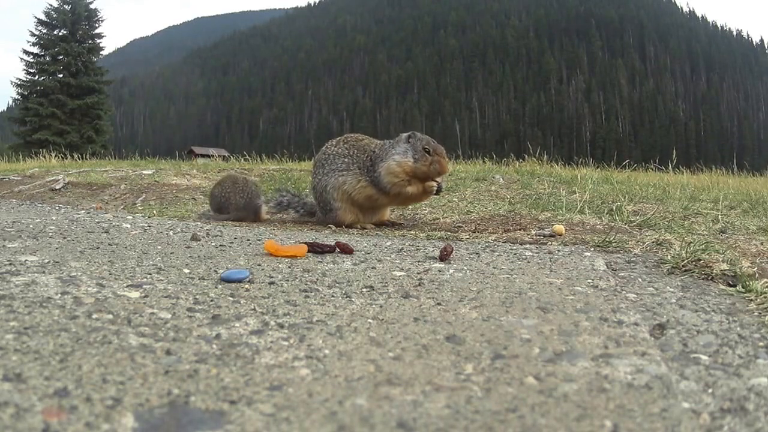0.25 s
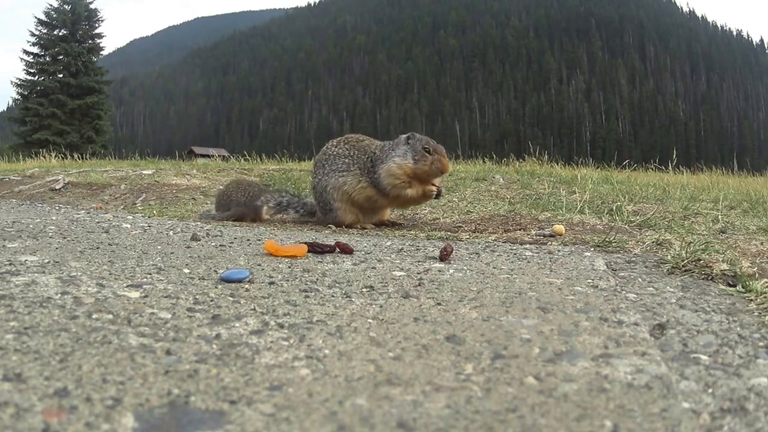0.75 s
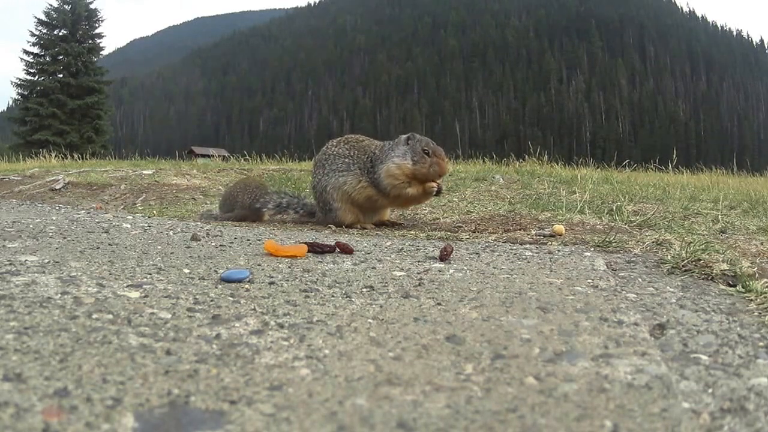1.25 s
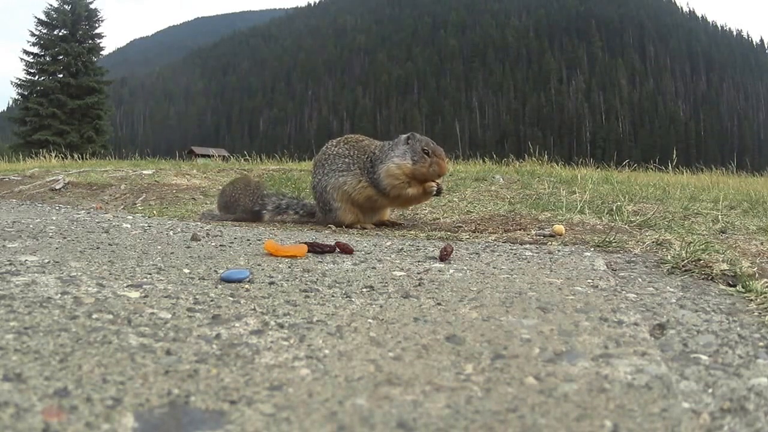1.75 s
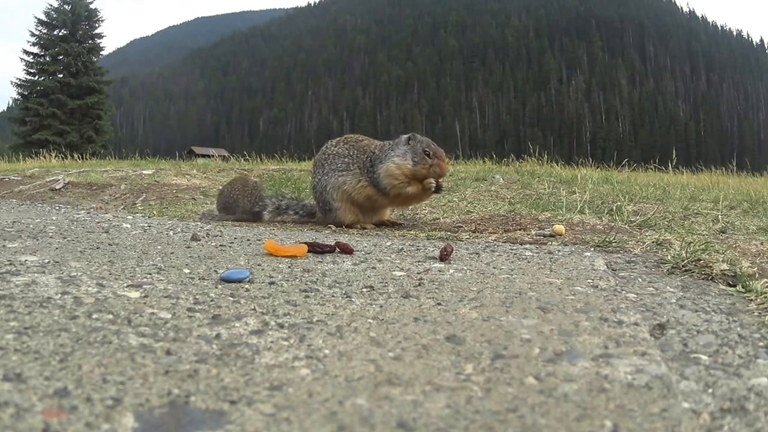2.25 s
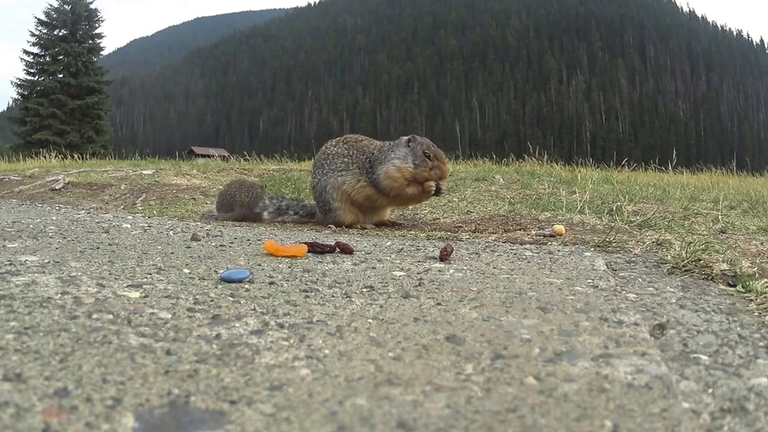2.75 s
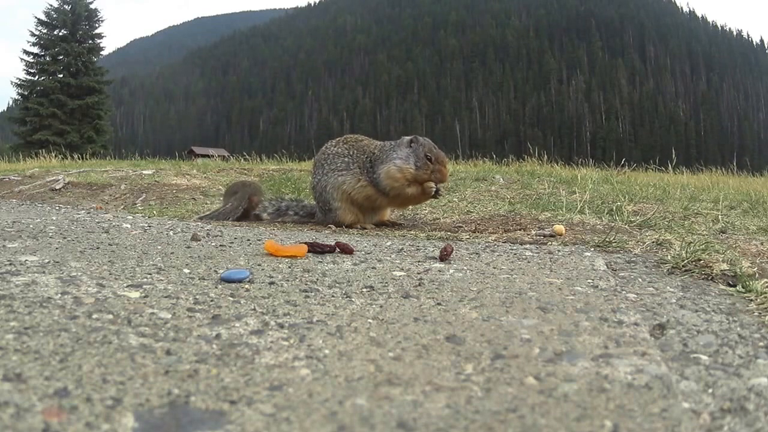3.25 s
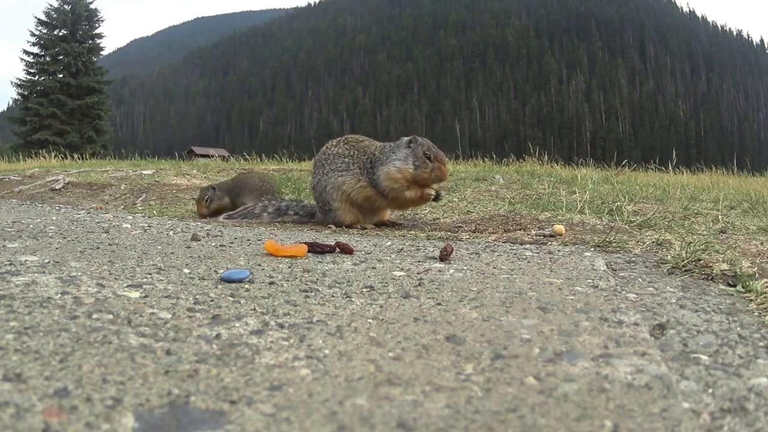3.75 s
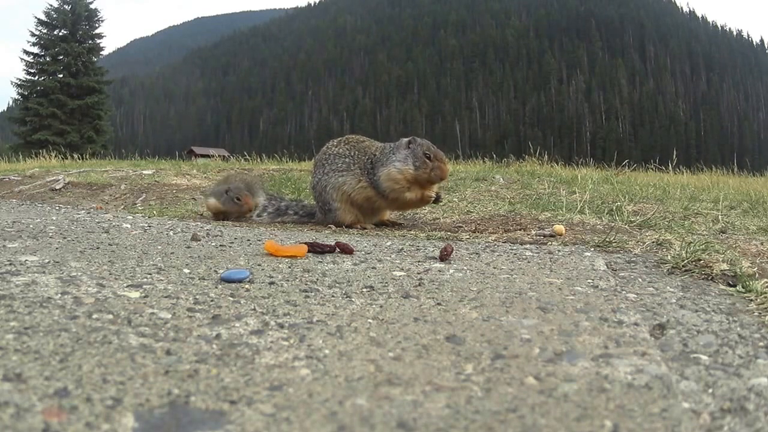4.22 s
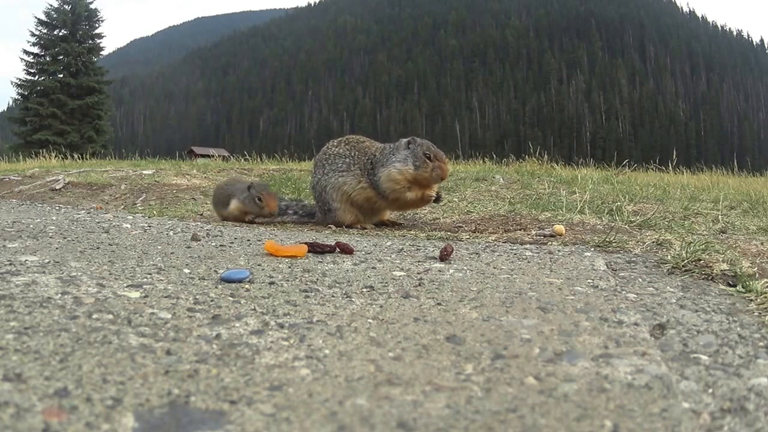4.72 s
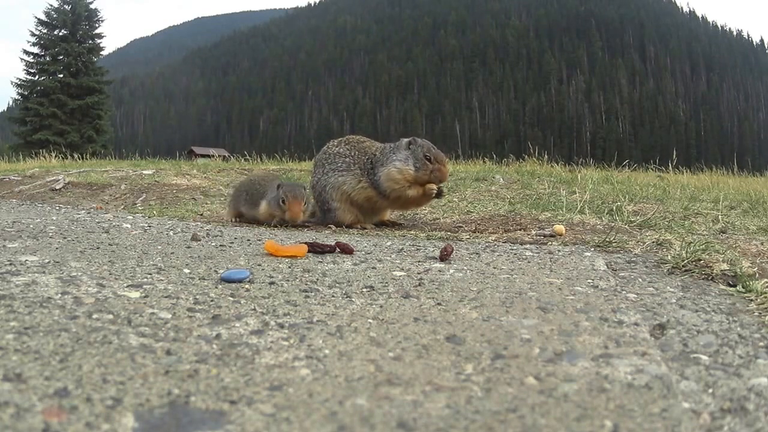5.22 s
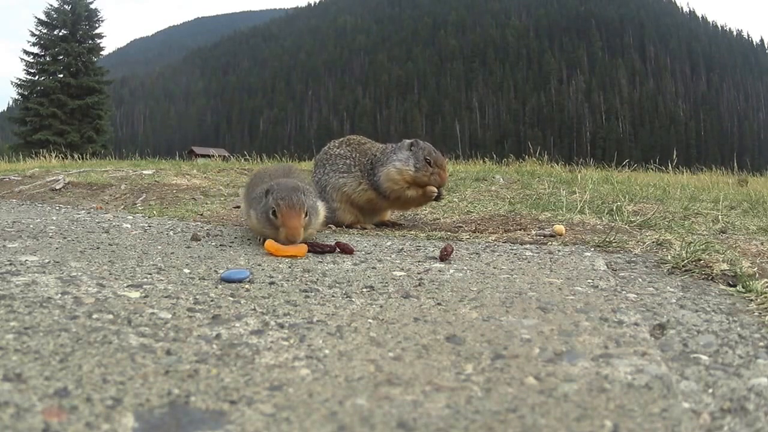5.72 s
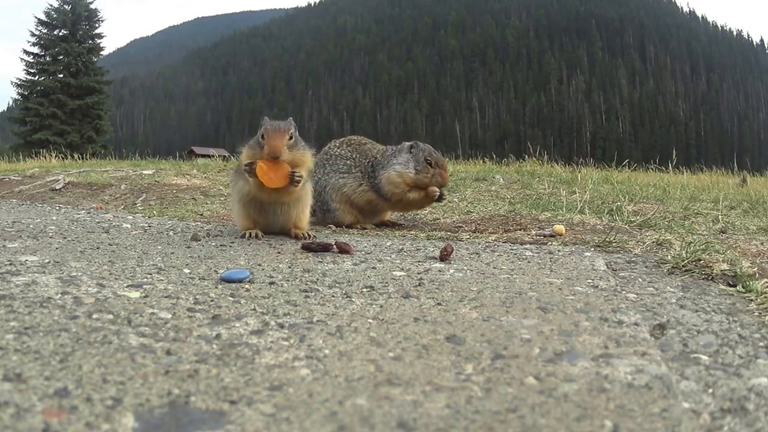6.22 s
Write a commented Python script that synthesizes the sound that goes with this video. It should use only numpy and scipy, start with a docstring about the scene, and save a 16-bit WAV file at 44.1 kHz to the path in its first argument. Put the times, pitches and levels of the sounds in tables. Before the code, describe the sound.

Outdoors in a wide, quiet meadow, dry food cracks sharply and close, in irregular bursts separated by faint nibbling. Very short, piercing animal whistles drop in pitch and scatter off ground and trees, answered by softer distant peeps. Early on something bumps the microphone stand dully; a small dry grass scuff follows. A low rumble swells gently past the middle, and tiny paws pat gravel near the end.

```python
"""A gravel path in a mountain meadow, where two ground squirrels feed close to a small microphone on the ground.
Snaps of food are double fractures exciting resonances; fainter chewing and dry scuffs are trains of random ticks,
and paw pats are decaying noise. Small animals whistle and chirp with gliding sines, answered by diffuse echoes.
A dull knock with a softer rebound rings the modes of the microphone's stand, over a low rumble and open-air hiss."""
import sys
import numpy as np
from scipy import signal
from scipy.fft import rfft, irfft, next_fast_len
from scipy.io import wavfile
from scipy.ndimage import uniform_filter1d

SR = 44100
rng = np.random.default_rng(int(sys.argv[2]) if len(sys.argv) > 2 else 0)


def generate_wav(sig):
    """Save sig (samples, or channels by samples) to the path in sys.argv[1] as 16-bit PCM at SR."""
    pcm = np.round(np.clip(np.atleast_2d(sig).T, -1, 1) * 32767).astype(np.int16)
    wavfile.write(sys.argv[1], SR, pcm)


N = 285327
TIME = np.arange(N) / SR

# Snaps of food: t/s, level/dB, crumb f/Hz, brittleness/dB, hollow ring/dB (the last two relative to the level)
BITES = [(.1359, -43, 2550, -12.5, -24), (0.6967, -39.5, 2200, -8.5, -19), (.7569, -49.5, 3000, -0.5, -10),
         (1.096, -52.5, 2900, 5, -7), (1.3806, -50.5, 3230, 0, -18), (1.8749, -39, 2360, -13, -8),
         (1.96, -55.5, 3450, 8.5, -14), (1.9641, -53, 3170, 4, -14), (2.1893, -51.5, 2980, -1.5, -15),
         (2.3137, -24, 2770, -6, -23), (2.381, -25.5, 3200, 2.5, -5), (2.4726, -34.5, 2930, -10.5, -30),
         (2.5019, -30.5, 2730, -3, -20), (2.7535, -43, 2940, -8.5, -14), (2.8373, -43, 2960, -4, -19),
         (2.8775, -40, 3040, 1.5, -24), (2.8806, -30.5, 3130, -7, -37), (3.0321, -44.5, 2340, 6, -4.5),
         (3.1328, -42, 2900, -1.5, -24), (3.1541, -29.5, 3440, -4, -20), (3.182, -35, 3500, 3, -17),
         (3.2872, -44.5, 2860, -5, -22), (3.3121, -36.5, 2270, -4.5, -9), (3.3737, -26, 2990, -3, -13),
         (3.727, -44, 2630, -6.5, -30), (4.2342, -50.5, 2420, -1.5, -17), (4.5687, -53.5, 2850, 4, -9),
         (4.7289, -45.5, 2600, -11, -22), (5.012, -50, 3080, -3, -2), (5.432, -30.5, 2800, -11.5, -23),
         (5.461, -46, 2800, -2, -8), (5.4674, -23.5, 2700, -4.5, -18.5), (5.556, -34.5, 2780, -10, -25),
         (5.5939, -34, 2680, 5.5, -12), (5.7061, -35.5, 2890, -8.5, -30), (5.7711, -30.5, 3230, 0, -31),
         (5.8959, -39.5, 2740, -9, -24), (5.9259, -32.5, 2580, -5, -31), (5.9351, -37.5, 2740, 2.5, -24),
         (5.9433, -40.5, 2850, -1, -24), (6.1248, -28.5, 2260, -5, -16), (6.253, -26.5, 2450, -9, -22)]
# Left minus right of hollow, crumb, edge and splinters: level difference/dB
BITE_PAN_DB = (-5.5, -4, -1.5, -6)
HOLLOW_HZ, HOLLOW_WIDTH_HZ, CRUMB_WIDTH_HZ = 1313, 135, 530
EDGE_HZ, EDGE_WIDTH_HZ = 4630, 940
SPLINTER_LOW_HZ, SPLINTER_HIGH_HZ = 6600, 11040
# Levels against the crumb for a piece of zero brittleness; brittleness raises both
EDGE_DB, SPLINTER_DB = -1.0, -5.5
# The second fracture: median delay, spread of the delay, amplitude relative to the first
SECOND_S, SECOND_SPREAD_OCTAVES, SECOND_SHARE = .00036, .35, 0.54

# Level curve of the faint chewing: t/s, level/dB
CHEWING_LEVEL = [(0, -63), (.35, -69), (1.0, -73), (1.3, -67), (2.1, -74), (3.2, -65.5), (4.2, -70),
                 (6.0, -63.5)]

# Strokes of a body shifting in dry grass: t/s, level/dB at the peak
SCUFFS = [(1.779, -52.5), (1.833, -47.5), (1.88, -45.5), (1.925, -58.5)]
# Spectrum of the dry scuff: f/Hz, relative level/dB
SCUFF_SPECTRUM = [(530, -55), (900, -23), (1520, -11.5), (1690, -20), (2310, 0.5), (3030, -14.5),
                  (4070, -6), (4380, -12), (4960, -8), (6520, -18), (11000, -33), (14300, -63),
                  (22000, -120)]
SCUFF_RISE_S, SCUFF_FALL_S = 0.02, 0.014

# Paws on gravel: t/s, thud drive level/dB, grit drive level/dB (before the gains in paws)
PAWS = [(5.484, -56.5, -65), (5.825, -58.5, -77), (5.866, -52, -80), (5.917, -55, -75), (6.075, -58, -71),
        (6.094, -73, -58.5), (6.162, -64, -65), (6.278, -60, -55.5), (6.349, -68, -66)]
# Resonances of ground and stand under a thud: f/Hz, width/Hz, relative level/dB
THUD_MODES = [(172, 27, -13), (314, 24, -3), (450, 100, -22)]
# Spectrum of shifting grit: f/Hz, relative level/dB
GRIT_SPECTRUM = [(300, -34), (700, 2), (1300, 9), (2500, -16), (6000, -34)]

# Whistles of the nearest caller: t/s, length/s, direct level/dB
NEAR_WHISTLES = [(0.402, 0.055, -41.5), (1.61, 0.048, -40), (2.982, 0.051, -37.5), (4.31, 0.047, -47.5),
                 (5.79, .052, -37)]
# Loudness through a near whistle: share of its length, relative level/dB
NEAR_SHAPE = [(0, -17.5), (.14, -2.5), (.32, -1), (.55, 2.5), (.74, 0.5), (.85, 4.5), (1, -8)]
NEAR_HZ, NEAR_THROWN_DB = 5025, -38
# Nearly level notes of far callers: t/s, length/s, f/Hz, direct level/dB, closing drop/octaves
FAR_WHISTLES = [(0.065, 0.078, 4340, -69, .06), (0.17, 0.037, 2690, -56, .1),
                (.959, 0.045, 3585, -56, 0.056), (1.064, 0.043, 3524, -52, 0.071),
                (1.19, 0.079, 3580, -66, 0.044), (1.416, 0.038, 3830, -50, 0.022),
                (2.467, 0.072, 3587, -57, .02), (2.623, 0.066, 3550, -61.5, 0.035),
                (3.612, 0.05, 3630, -54.5, .04), (3.728, 0.039, 3540, -56, 0.11),
                (3.855, .037, 3570, -61, .05), (4.588, 0.049, 4730, -58, 0.18),
                (4.737, .062, 3870, -62, .3), (5.065, 0.05, 3620, -50.5, .01),
                (5.25, 0.059, 3590, -59.5, .01)]
# Short rising chirps of another caller: t/s, direct level/dB
CHIRPS = [(.294, -65), (1.572, -55), (2.798, -56), (3.925, -56), (5.152, -54), (6.442, -46)]
# Loudness through a far note or chirp: share of its length, relative level/dB
FAR_SHAPE = [(0, -12), (.3, 1.5), (.7, 0.5), (1, -1.5)]
CHIRP_HZ, CHIRP_S, CHIRP_THROWN_DB = 3470, 0.0277, -56.5
# Patches of ground and trees that throw sound back: delay t/s, spread/s, weight/dB
ECHOES = [(.006, 0.0052, -4), (.036, 0.026, -6.5), (0.077, 0.045, -17), (.208, 0.0098, -18)]

# Knock on the stand and its rebound: t/s, strike level/dB, contact time/s
KNOCKS = [(0.967, 0.5, .0005), (1.04, -4.5, 0.0035)]
# Modes of the stand: f/Hz, level/dB for an instant contact, 60 dB decay time/s
STAND_MODES = [(43.7, -54, 3.9), (69, -34, 0.15), (115.6, -46, 0.41), (132.85, -42, 0.91), (219, -47, 0.25),
               (334, -50.5, 0.32), (426, -57, 0.13)]

# Broad resonances of the rumble: f/Hz, width/Hz of each of two filter passes, relative level/dB
RUMBLE_MODES = [(125.4, 20.7, -0.5), (217, 99, -4), (316, 49, -7)]
RUMBLE_DB, SWELL_DB, SWELL_AT_S, SWELL_WIDTH_S = -70, 8.5, 4.27, 0.46

# Spectrum of the air common to both sides: f/Hz, relative level/dB
AIR_MID = [(12, -48), (20, -0.5), (81, -5), (124, -3.5), (259, -13), (328, -11.5), (428, -12.5), (635, -14),
           (688, -14.5), (827, -14.5), (2030, -16.5), (2640, -15), (3440, -17), (4980, -19), (11000, -23),
           (14300, -120), (22000, -120)]
# Spectrum of the air opposed between the sides: f/Hz, relative level/dB
AIR_SIDE = [(12, -51), (20, -8), (85, -22), (124, -4), (153, -26), (189, -6.5), (303, -9), (346, -6),
            (475, -5.5), (995, -5.5), (1140, -6.5), (2510, -10.5), (11000, -25), (14300, -62),
            (22000, -120)]
AIR_MID_DB, AIR_SIDE_DB = -60, -58.5
# Narrow bands that stand out of the air: f/Hz, nominal width/Hz, level/dB
HUMS = [(126.3, 18.4, -73), (215, 22, -79), (322.5, 37, -84.5), (1336, 110, -74.5)]
# A thin high tone: f/Hz, nominal width/Hz, level/dB
THIN_TONE = (8333, 8, -82)
CUTOFF_HZ = 11200


def from_db(db):
    """Level: an amplitude ratio is ten to the power of dB / 20."""
    return 10 ** (np.asarray(db) / 20)


def rms_one(x):
    """Normalisation: dividing by the root mean square gives unit power."""
    return x / np.sqrt(np.mean(x ** 2) + 1e-20)


def add(out, s, sound):
    """Superposition: a sound starting at s seconds sums with the rest."""
    i = int(np.clip(round(s * SR), 0, N - 1))
    out[..., i:i + sound.shape[-1]] += sound[..., :N - i]


def panned(x, pan_db):
    """Interchannel level difference: the left is louder than the right by pan_db."""
    return x * from_db([[pan_db / 2], [-pan_db / 2]])


def coloured(x, spectrum):
    """Spectral shaping: weight by dB points joined over log frequency, then set the rms to 1."""
    hz, db = np.transpose(spectrum)
    size = next_fast_len(len(x))
    bins = np.maximum(np.fft.rfftfreq(size, 1 / SR), 1)
    gain = from_db(np.interp(np.log(bins), np.log(hz), db))
    return rms_one(irfft(rfft(x, size) * gain, size)[:len(x)])


def resonate(x, hz, width_hz):
    """Damped resonance: a pole pair rings at hz, with about unit gain at its peak."""
    r = np.exp(-np.pi * width_hz / SR)
    zeros = [(1 - r * r) / 2, 0, (r * r - 1) / 2]
    poles = [1, -2 * r * np.cos(2 * np.pi * hz / SR), r * r]
    return signal.lfilter(zeros, poles, x + 1e-18)


def narrow_noise(hz, width_hz):
    """Narrow-band noise: two equal resonances select a band; the first second settles and is dropped."""
    noise = rng.standard_normal(N + SR)
    return rms_one(resonate(resonate(noise, hz, width_hz), hz, width_hz)[SR:])


def band(x, low_hz, high_hz):
    """Band-pass: gentle slopes on both sides of the pass band."""
    return signal.sosfilt(signal.butter(2, [low_hz, min(high_hz, SR / 2.2)], "band", fs=SR, output="sos"), x)


def crackle(per_s, spread_db):
    """Impulse noise: tiny fractures at random times, with random signs and scattered sizes."""
    sizes = from_db(spread_db * np.minimum(rng.exponential(1, N), 4)) * rng.choice([-1, 1], N)
    return sizes * (rng.random(N) < per_s / SR)


def bites(crumble_db=-32, crumble_s=0.0045, echo_s=0.008, echo_db=-25):
    """Impulsive excitation: a double fracture with trailing crumble rings hollow, crumb, edge and splinters."""
    out, t = np.zeros((2, N)), np.arange(SR // 40) / SR
    millisecond = SR / 1000  # in samples
    for s, db, pitch_hz, brittle_db, hollow_db in BITES:
        force = from_db(crumble_db) * rng.standard_normal(len(t)) * np.exp(-t / crumble_s)
        force[0] += 1
        # the second fracture cuts a comb into the spectrum, so each snap has its own colour
        lag_s = SECOND_S * 2 ** (SECOND_SPREAD_OCTAVES * rng.standard_normal())
        force[int(np.clip(round(lag_s * SR), 1, len(t) - 1))] += SECOND_SHARE
        # one weak reflection from nearby
        force[int(echo_s * SR)] += from_db(echo_db)

        hollow = resonate(band(band(force, 1250, 3700), 1250, 3700), HOLLOW_HZ, HOLLOW_WIDTH_HZ)
        crumb = resonate(band(force, 1480, 3400), pitch_hz, CRUMB_WIDTH_HZ)
        edge = resonate(band(force, 3270, 7820), EDGE_HZ, EDGE_WIDTH_HZ)
        splinters = -band(force, SPLINTER_LOW_HZ, SPLINTER_HIGH_HZ)
        parts = [hollow, crumb, edge, splinters]
        parts_db = [hollow_db, 0, EDGE_DB + brittle_db, SPLINTER_DB + brittle_db]
        for part, part_db, pan_db in zip(parts, parts_db, BITE_PAN_DB):
            # the level is the rms the part would have if its energy filled one millisecond
            unit_part = part * np.sqrt(millisecond / np.sum(part ** 2))
            add(out, s, panned(from_db(db + part_db) * unit_part, pan_db))
    return out


def chewing(per_s=150, spread_db=2.0):
    """Random excitation: small ticks of molars grinding crumbs ring two broad resonances and a high band."""
    ticks = crackle(per_s, spread_db)
    crumb = resonate(ticks, 2550, 910)
    edge = 0.62 * resonate(ticks, EDGE_HZ, EDGE_WIDTH_HZ)
    splinters = 0.069 * band(ticks, SPLINTER_LOW_HZ, SPLINTER_HIGH_HZ)
    return rms_one(crumb + edge + splinters) * from_db(np.interp(TIME, *np.transpose(CHEWING_LEVEL)))


def scuff(per_s=330, spread_db=0.5, stalk_width_hz=300, snap_db=-3, count=14):
    """Modal crackle: dry stalks tick at pitches of their own among unpitched snaps, in swelling strokes."""
    level = 0
    for s, db in SCUFFS:
        stroke = np.exp(np.minimum((TIME - s) / SCUFF_RISE_S, (s - TIME) / SCUFF_FALL_S))
        level = level + from_db(db) * stroke
    pitches = np.geomspace(1300, 7000, count)
    stalks = sum(resonate(crackle(per_s / count, spread_db), hz, stalk_width_hz) for hz in pitches)
    snaps = rms_one(crackle(per_s / 2, spread_db))
    crunch = rms_one(stalks) + from_db(snap_db) * snaps
    return panned(coloured(crunch, SCUFF_SPECTRUM) * level, pan_db=3.5)


def paws(rise_s=0.002, fall_s=0.018, grit_s=0.0084):
    """Contact noise: a soft pat drives low resonances with a noise burst and shifts grit for a moment."""
    thud, grit, t = np.zeros(N), np.zeros(N), np.arange(SR // 8) / SR
    attack = 1 - np.exp(-t / rise_s)
    for s, thud_db, grit_db in PAWS:
        add(thud, s, from_db(thud_db) * attack * np.exp(-t / fall_s))
        add(grit, s, from_db(grit_db) * attack * np.exp(-t / grit_s))
    push = thud * rng.standard_normal(N)
    # the root offsets the power lost in a narrow resonance
    low = sum(from_db(db) * resonate(push, hz, width_hz) * np.sqrt(SR / width_hz)
              for hz, width_hz, db in THUD_MODES)
    shifting = 2 * grit * coloured(rng.standard_normal(N), GRIT_SPECTRUM)
    return panned(low, pan_db=-9.5) + panned(shifting, pan_db=1.5)


def whistle(length_s, pitch_hz, shape, scoop_octaves, drop_octaves, overtone_db, scoop_share,
            waver=0.0026, drop_share=0.445):
    """Frequency modulation: a sine scoops up, holds and drops; returns the fundamental and its octave."""
    u = np.linspace(0, 1, int(length_s * SR))
    jitter = rms_one(uniform_filter1d(rng.standard_normal(SR // 4), size=90))[:len(u)]
    scoop = scoop_octaves * np.maximum(1 - u / scoop_share, 0) ** 2
    drop = drop_octaves * np.maximum(1 - (1 - u) / drop_share, 0) ** 3.1
    hz = pitch_hz * 2 ** -(scoop + drop) * (1 + waver * jitter)
    phase = 2 * np.pi * np.cumsum(hz) / SR
    level = from_db(np.interp(u, *np.transpose(shape))) * signal.windows.tukey(len(u), .08)
    return level * np.sin(phase), level * from_db(overtone_db) * np.sin(2 * phase)


def calls(rows):
    """Direct and reflected paths: from (s, direct dB, thrown dB, whistle) rows; the thrown lacks the overtone."""
    direct, thrown = np.zeros(N), np.zeros(N)
    for s, direct_db, thrown_db, (tone, overtone) in rows:
        add(direct, s, from_db(direct_db) * (tone + overtone))
        add(thrown, s, from_db(thrown_db) * tone)
    return direct, thrown


def meadow(direct, thrown, scatter_db, scatter_t60, forest_db, forest_t60, likeness=0.515):
    """Diffuse reflection: smeared echoes, quick scatter from rough ground and a slower answer from the trees."""
    t = np.arange(SR // 2) / SR
    fades = []
    for db, t60 in ((scatter_db, scatter_t60), (forest_db, forest_t60)):
        fades.append((db, np.exp(-np.log(1000) * t / t60) * (1 - np.exp(-t / 0.035))))
    for s, spread, db in ECHOES:
        fades.append((db, (t >= s) * np.exp(-2 * np.abs(t - s) / spread)))
    response = 0
    for db, fade in fades:
        # likeness is the share of noise power common to both sides
        common = np.sqrt(likeness) * rng.standard_normal(len(t))
        noise = common + np.sqrt(1 - likeness) * rng.standard_normal((2, len(t)))
        spectrum = rfft(noise * fade)
        # each patch smears the sound in time but returns all pitches about equally
        flat = irfft(spectrum / (np.abs(spectrum) + 1e-12), len(t))
        # every response stops at 0.45 s
        response = response + from_db(db) * flat * (fade > 0) * (t < .45)
    return direct + signal.fftconvolve(thrown[None], response, axes=1)[:, :N]


def near_whistles(echo_follows=0.3):
    """Source directivity: the nearest caller turns, so its echo varies less than its direct sound."""
    mean_db = np.mean([db for s, length, db in NEAR_WHISTLES])
    rows = []
    for s, length, db in NEAR_WHISTLES:
        call = whistle(length, NEAR_HZ, NEAR_SHAPE, scoop_octaves=0.0616, drop_octaves=0.239,
                       overtone_db=-19.5, scoop_share=0.373)
        rows.append((s, db, NEAR_THROWN_DB + echo_follows * (db - mean_db), call))
    return meadow(*calls(rows), scatter_db=-11, scatter_t60=0.31, forest_db=-25, forest_t60=1.3)


def far_whistles(echo_db=-3.0):
    """Reverberant ratio: distant notes and rising chirps carry a stronger, slower-fading answer from the trees."""
    rows = []
    for s, length, hz, db, drop in FAR_WHISTLES:
        note = whistle(length, hz, FAR_SHAPE, scoop_octaves=0.017, drop_octaves=drop,
                       overtone_db=-25, scoop_share=0.45)
        rows.append((s, db, db + echo_db, note))
    for s, db in CHIRPS:
        chirp = whistle(CHIRP_S, CHIRP_HZ, FAR_SHAPE, scoop_octaves=0.31, drop_octaves=0.11,
                        overtone_db=-40, scoop_share=0.665)
        rows.append((s, db, CHIRP_THROWN_DB, chirp))
    return meadow(*calls(rows), scatter_db=-9, scatter_t60=0.37, forest_db=-8.5, forest_t60=1.9)


def stand(shudder_db=-56, shudder_s=0.084):
    """Modal decay: a knock and its softer rebound ring damped sines and a noisy shudder; the lowest lasts longest."""
    out, shake, t = np.zeros(N), np.zeros(N), np.arange(2 * SR) / SR
    for s, db, contact_s in KNOCKS:
        ring = 0
        for hz, mode_db, t60 in STAND_MODES:
            # a long contact spares the higher modes
            gain = from_db(mode_db) / np.hypot(1, (2 * hz * contact_s) ** 2)
            ring = ring + gain * np.sin(2 * np.pi * hz * t) * np.exp(-np.log(1000) * t / t60)
        attack = from_db(db) * (1 - np.exp(-t / 0.0059))
        add(out, s, attack * ring)
        add(shake, s, attack * np.exp(-t / shudder_s))
    shudder_spectrum = [(40, -14), (100, 5), (220, -5), (430, -5), (650, -35)]  # f/Hz, relative level/dB
    shudder = from_db(shudder_db) * shake * coloured(rng.standard_normal(N), shudder_spectrum)
    return panned(out + shudder, pan_db=-4.5)


def rumble():
    """Filtered noise: three low resonances sound together and swell once."""
    drone = sum(from_db(db) * narrow_noise(hz, width_hz) for hz, width_hz, db in RUMBLE_MODES)
    swell = np.exp(-((TIME - SWELL_AT_S) / SWELL_WIDTH_S) ** 2)
    return panned(rms_one(drone) * from_db(RUMBLE_DB + SWELL_DB * swell), pan_db=-6.0)


def air():
    """Stationary noise: common and opposed parts make a wide hiss, with centred hums and a thin high tone."""
    mid = from_db(AIR_MID_DB) * coloured(rng.standard_normal(N), AIR_MID)
    side = from_db(AIR_SIDE_DB) * coloured(rng.standard_normal(N), AIR_SIDE)
    for hz, width_hz, db in HUMS + [THIN_TONE]:
        # two passes narrow a band, so each pass is made wider
        mid = mid + from_db(db) * narrow_noise(hz, 1.3 * width_hz)
    return panned(np.array([mid + side, mid - side]), pan_db=-0.3)


def scene():
    """Superposition: feeding close by, calls across the meadow, the shaken stand and the open air."""
    feeding = bites() + chewing() + scuff() + paws()
    callers = near_whistles() + far_whistles()
    return feeding + callers + stand() + rumble() + air()


def record(dry):
    """Low-pass filtering: a steep elliptic filter ends the treble at the cutoff."""
    return signal.sosfilt(signal.ellip(10, .2, 70, CUTOFF_HZ, fs=SR, output="sos"), dry)


dry = scene()
out = record(dry)
generate_wav(out)
```